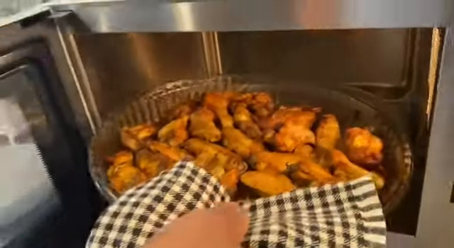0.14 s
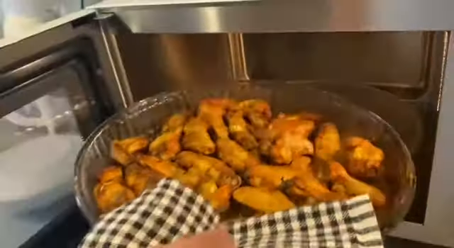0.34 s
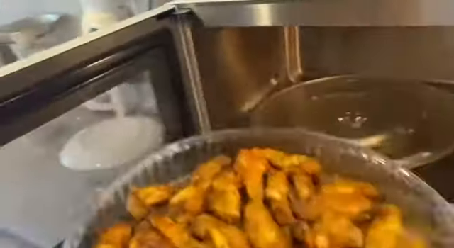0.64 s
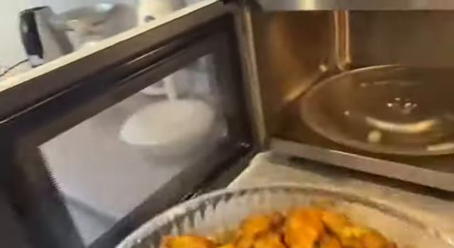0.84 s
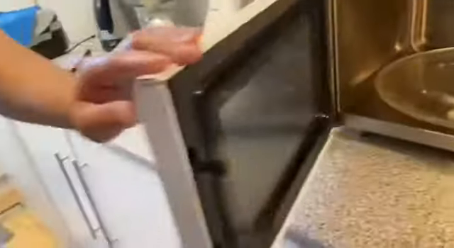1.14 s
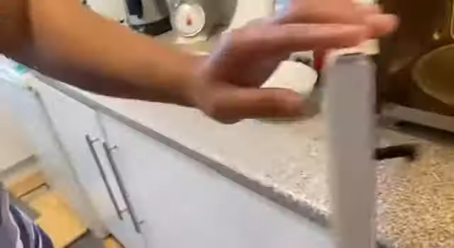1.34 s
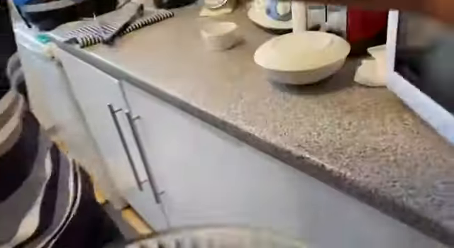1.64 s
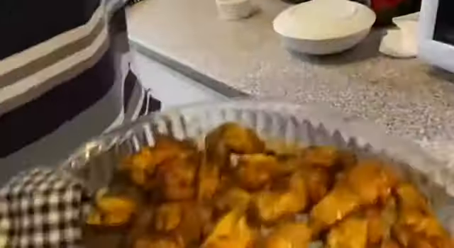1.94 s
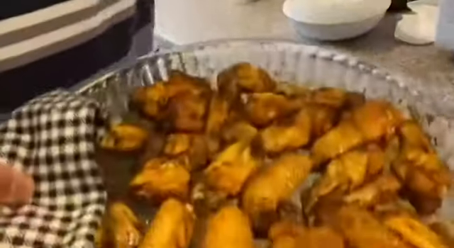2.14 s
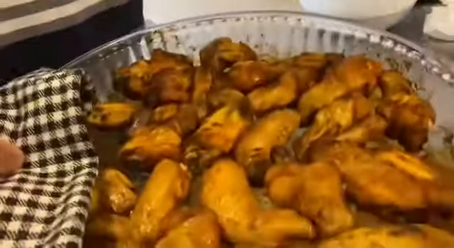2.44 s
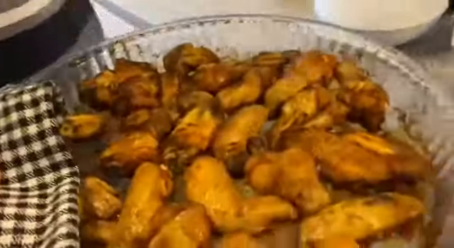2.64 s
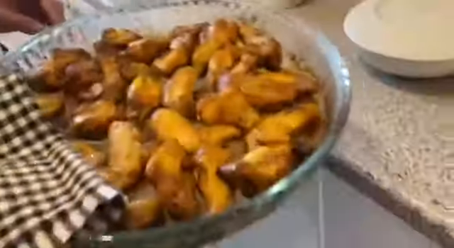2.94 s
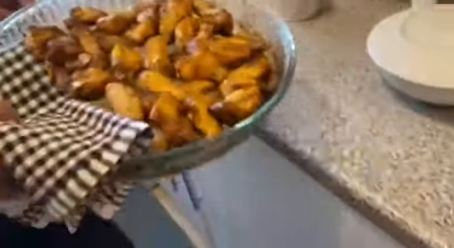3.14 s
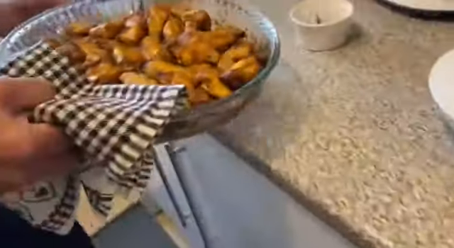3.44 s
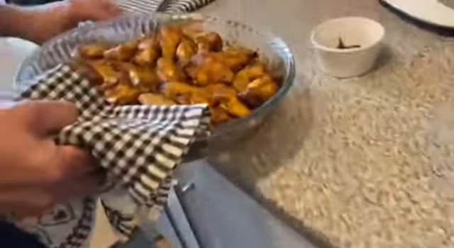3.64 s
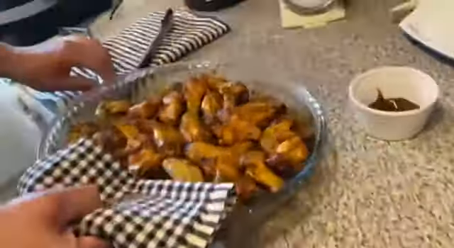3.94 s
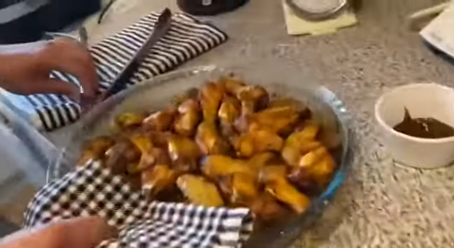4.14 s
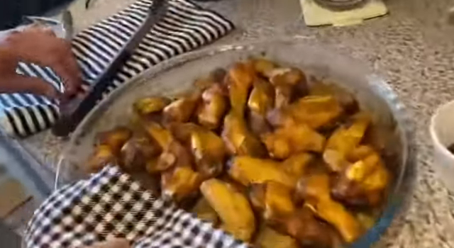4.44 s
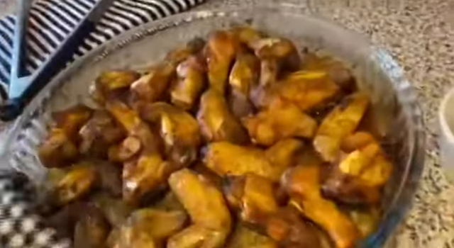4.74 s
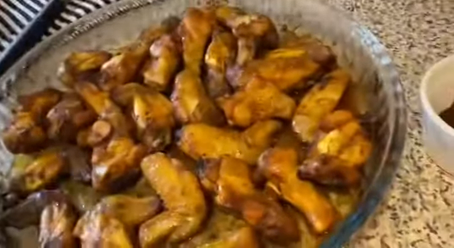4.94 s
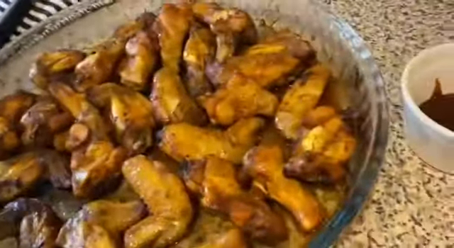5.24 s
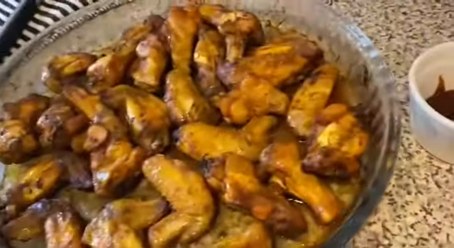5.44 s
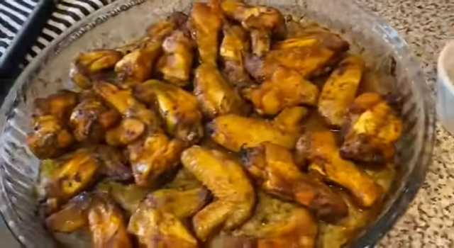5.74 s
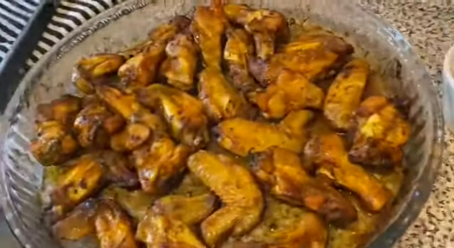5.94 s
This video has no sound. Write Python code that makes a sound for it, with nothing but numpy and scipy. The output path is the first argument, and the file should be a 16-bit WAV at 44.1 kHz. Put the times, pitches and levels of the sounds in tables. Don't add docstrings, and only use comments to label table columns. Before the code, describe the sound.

A steady oven fan fills a small kitchen from 0 to 6 seconds: broad airy rush over a low blade hum, strongest at the start and slowly changing colour as the handheld stereo microphone moves away. Faint cloth rubs, a tiny tick near 0.75 and a breathy duct swell around 0.9 come first. Fabric brushes at 1.15 and 1.9. At 2.01 a latch scrapes and clicks, and at 2.05 the door slams, loud, boxy and metallic, with a short low ring. Cloth rustles from 2.2, with a light glass tap at 2.63, growing busier through 3.7 with small ticks. At 3.85 a heavy glass dish lands on the worktop with a deep, blunt thud. Sliding and thin glassy ticks follow, then a second low knock at 4.39 as it settles. Cloth slips away by about 5; another soft airy swell at 5.2 and a tiny tick at 5.48 leave the fan and low hand rumble.

```python
import sys
import numpy as np
from scipy import signal
from scipy.fft import rfft, irfft, next_fast_len
from scipy.io import wavfile
from scipy.ndimage import uniform_filter1d

SR = 44100
rng = np.random.default_rng(int(sys.argv[2]) if len(sys.argv) > 2 else 0)


def undo_db(level):
    steps = np.asarray(level, float) / 20
    return 10 ** steps


def output_pcm(signal):
    pcm = np.clip(np.atleast_2d(signal).T, -1, 1) * 32767
    wavfile.write(sys.argv[1], SR, np.round(pcm).astype(np.int16))


N = 268555
SLAM_S = 2.043


def evened(x):
    return x / np.sqrt(np.mean(x ** 2) + 1e-20)


def read(points, hz):
    f, value = np.transpose(points)
    return np.interp(np.log(hz + 1), np.log(f + 1), value)


def columns(rows):
    s, *values = np.transpose(rows)
    return [np.interp(np.arange(N) / SR, s, v) for v in values]


def add(mix, s, sound):
    part = mix[round(s * SR):][:len(sound)]
    part += sound[:len(part)]


def shape(x, gain):
    size = next_fast_len(N)
    spectrum = rfft(np.resize(x, size))
    return irfft(spectrum * gain(np.fft.rfftfreq(size, 1 / SR)), size)[:N]


def noise_band(gain):
    return evened(shape(rng.standard_normal(N), gain))


def drift(hz):
    return noise_band(lambda f: (f > 0) / (1 + (f / hz) ** 4))


def swells(rows, rise_s, fall_s, drop_db=20.):
    s, db = np.transpose(rows)[:, :, None]
    since = np.arange(0, N + 64, 64) / SR - s
    return undo_db(2 * (db - drop_db * np.maximum(-since / rise_s, since / fall_s)))


def total_db(power, floor_db):
    total = np.interp(np.arange(N) / 64, np.arange(power.shape[1]), power.sum(0))
    return 10 * np.log10(total + undo_db(2 * floor_db))


# frequency in Hz, density in dB per Hz.
RUSH_SPECTRUM = [(25, -20), (60, -16), (90, -17), (185, -6), (265, -16.5), (360, -12), (543, -10),
                 (800, -14), (1520, -20.5), (2600, -32), (4930, -40), (7250, -54.5), (9500, -53),
                 (12000, -55)]
# frequency in Hz, left-right likeness 0-1.
LIKENESS = [(60, 1), (130, 1), (270, 0.55), (570, 0.28), (1200, 0.13), (2500, 0.19), (5300, 0.32),
            (11000, 0.14)]
# frequency in Hz, change in dB.
FAR_COLOUR = [(200, 2), (300, 2.), (700, -3.), (1200, 0.), (1750, 2.5), (2300, -1.5), (4000, 0), (9000, -1)]
# time in seconds, share of the way 0-1.
DISTANCE = [(0, 0.), (2, 0.37), (4, 0.15), (4.7, 1), (6.09, 0.8)]
# time in seconds, place along the kitchen in m, level of the rush in dB.
WALK = [(0, 0., -41), (.8, .07, -43), (1.4, .1, -44), (1.95, .17, -45), (2.4, .25, -45.3),
        (2.85, .32, -45.6), (3.5, .39, -45.3), (4.1, .45, -45), (4.7, .48, -46), (5.4, .48, -44.6),
        (6.09, .47, -48)]
# time in seconds, added rush in dB, added boom in dB.
STIRS = [
    (2.17, -40, -40),
    (3.87, -42, -45),
    (4.05, -48, -37),
    (4.41, -55, -35),
]
STIR_RISE_S, STIR_FALL_S = .08, .21


def fan_rush():
    frames, hz = N // 256 + 5, np.fft.rfftfreq(1024, 1 / SR)
    a, b, c, d, patches = rng.standard_normal((frames, 513, 5)).T
    patches = evened(uniform_filter1d(uniform_filter1d(patches, 8, 0), 10, 1))
    same = np.clip(read(LIKENESS, hz), 0, 1)[:, None]
    left = a + 1j * b
    right = same * left + np.sqrt(1 - same ** 2) * (c + 1j * d)
    away = np.interp(np.arange(frames) * 256 / SR, *np.transpose(DISTANCE))
    colour_db = read(RUSH_SPECTRUM, hz)[:, None] + read(FAR_COLOUR, hz)[:, None] * away + 1.63 * patches
    coloured = np.array([left, right]) * undo_db(colour_db)
    rush = signal.istft(coloured, nperseg=1024, noverlap=768)[1][:, :N]
    body = shape(rush[0], lambda f: (f > 250) * (f < 1500))
    stirred = swells(np.array(STIRS)[:, :2], STIR_RISE_S, STIR_FALL_S)
    return undo_db(total_db(stirred, columns(WALK)[1])) * rush / np.std(body)


# frequency in Hz, width in Hz, level in dB.
ROOM_MODES = [(119, 7.4, 2.5), (134, 11.3, 2.5), (146, 12, -4.5), (100, 7, -14), (80, 11, -9)]


def standing_waves():
    def modes(f):
        return sum(undo_db(db) / (1 + (2 * (f - hz) / width) ** 2) for hz, width, db in ROOM_MODES)

    boom, difference = noise_band(modes), noise_band(modes)
    place = columns(WALK)[0]
    deep_db = 14 * (place - .46)
    boom = boom + (undo_db(deep_db) - 1) * shape(boom, lambda f: f < 127)
    still_db = -48.5 + 72 * (place - .06) ** 2
    stirred = swells(np.array(STIRS)[:, ::2], STIR_RISE_S, STIR_FALL_S, drop_db=8.)
    return undo_db(total_db(stirred, still_db)) * (boom + 0.091 * np.array([[1], [-1]]) * difference)


# time in seconds, rumble in dB.
JOLTS = [(0., -57), (.68, -52), (.9, -50), (1.3, -58), (2.07, -40), (2.29, -43), (2.95, -50), (2.68, -48),
         (3.31, -44), (3.87, -36), (4.14, -46), (4.41, -35), (4.85, -49), (5.3, -50), (5.78, -50)]


def hand_rumble():
    rumble = noise_band(lambda f: (f / 40.) ** 2 / (1 + (f / 67.0) ** 6))
    rumble_db = total_db(swells(JOLTS, rise_s=.12, fall_s=.2), floor_db=-66)
    return undo_db(rumble_db + 0.5) * rumble


# level in dB, echo strength 0-1, place of the dip in m, gain while the door is open in dB.
TONES = [(-48.5, .6, .27, 6.), (-56.5, .5, .15, 1.5), (-55, .75, .15, 0.), (-51, .2, .05, 1.)]


def hum():
    blade_hz, mains_hz, sound_m_per_s = 178.8, 198, 343
    t = np.arange(N) / SR
    turns = np.cumsum(blade_hz * (1 + .0008 * drift(3.)) / SR)
    cycles = [turns, 2 * turns, 3 * turns, mains_hz * t, 1.5 * mains_hz * t]
    place = columns(WALK)[0]
    levels = []
    for (db, echo, dip, open_db), hz in zip(TONES, [blade_hz, 2 * blade_hz, 3 * blade_hz, mains_hz]):
        interference = abs(1 - echo * np.exp(4j * np.pi * hz * (place - dip) / sound_m_per_s))
        levels.append(db + open_db * (t < SLAM_S) + 20 * np.log10(interference))
    levels.append(levels[-1] - 10.)
    leads = [0.15, 0.46, 0.93, 0.99, 0.57]
    wavers_db = [.8, 2.5, 2.2, 1.2, 2.5]
    side = np.array([[.5], [-.5]])
    total = np.zeros((2, N))
    for db, cycle, lead, waver_db in zip(levels, cycles, leads, wavers_db):
        wavering = np.sqrt(2) * undo_db(db + waver_db * drift(9.))
        total += wavering * np.sin(2 * np.pi * cycle + side * lead)
    return total


# time of the peak in seconds, level in dB.
DUCT_SWELLS = [
    (.87, -56),
    (5.17, -56),
    (5.55, -60),
]


def duct():
    centre_hz, width_hz = 1750, 350.
    sides = np.array([noise_band(lambda f: 1 / (1 + (2 * (f - centre_hz) / width_hz) ** 4)) for _ in range(2)])
    swell_db = total_db(swells(DUCT_SWELLS, rise_s=.36, fall_s=.36), floor_db=-90)
    return undo_db(swell_db) * (sides + .6 * sides[::-1])


# frequency in Hz, t60 in seconds.
KITCHEN_T60 = [(100, 0.22), (400, 0.27), (1500, 0.27), (5000, 0.25), (10000, 0.2)]


def kitchen(x):
    taps = np.zeros((2, SR // 2))
    at = np.arange(200, SR // 2 - 20, 20) + rng.integers(0, 20, (2, (SR // 2 - 201) // 20))
    np.put_along_axis(taps, at, rng.choice([-1., 1.], at.shape), 1)
    hz, t, z = signal.stft(taps, SR, nperseg=256)
    decay = undo_db(-60 * t / read(KITCHEN_T60, hz)[:, None])
    tail = signal.istft(z * decay, SR, nperseg=256)[1]
    tail[1] = 0.078 * tail[0] + 0.77 * tail[1]
    return signal.fftconvolve(x[None], tail / np.linalg.norm(tail[0]), axes=1)[:, :N]


# frequency in Hz, lead of the left port in radians.
NEAR_LEAD = [(100, -0.065), (300, -0.13), (600, -0.81), (1460, -1.33), (3200, 1.25), (5000, .6),
             (8000, -1.25)]
# frequency in Hz, left minus right in dB.
NEAR_BALANCE = [(100, -1), (490, 0.5), (1400, 0), (4000, 5.5), (11000, 2)]


def ports(x):
    def transfer(f, side):
        return undo_db(side * read(NEAR_BALANCE, f)) * np.exp(1j * side * read(NEAR_LEAD, f))

    return np.array([shape(x, lambda f: transfer(f, side)) for side in (.5, -.5)])


def friction(level_db, spectrum, per_s, spread_db, tilt_db=0):
    sizes = undo_db(spread_db * np.minimum(rng.exponential(1, N), 4))
    slips = rng.standard_normal(N) * sizes * (rng.random(N) < per_s / SR)
    colour = evened(shape(slips, lambda f: undo_db(read(spectrum, f))))
    dull = shape(colour, lambda f: 1 / (1 + (f / 3000.) ** 4))
    return undo_db(level_db) * (undo_db(-2 * tilt_db) * dull + colour - dull)


# time of the peak in seconds, level in dB, length in seconds, brightness in dB.
STROKES = [(0., -63, .12, -3), (.85, -64, .7, -3), (1.152, -55, .16, 0.), (1.3, -60, .35, -2),
           (1.6, -63, .2, 1.), (1.89, -54, .28, -1), (2.22, -58, .15, 0.), (2.344, -54, .24, 14),
           (2.7, -48.5, .2, -.6), (2.655, -54, .08, 0.), (2.74, -54, .1, 0.), (2.918, -54, .17, 5),
           (3.026, -51.5, .11, .6), (3.116, -53.5, .09, 8), (3.228, -55, .14, 8), (3.35, -53.5, .1, 7),
           (3.456, -47.5, .11, 2.), (3.564, -46, .15, -1.2), (3.682, -50, .16, 1.2), (3.91, -61, .3, 6),
           (4.07, -50.5, .08, -1.5), (4.165, -49, .18, 2.), (4.32, -47.5, .06, -3), (4.39, -49, .12, 0.),
           (4.51, -54, .06, 1.2), (4.64, -54, .2, 8), (4.94, -49, .12, 13), (5.47, -68, .07, -1.2),
           (5.56, -65, .2, 2.), (5.74, -62, .12, 1.2)]
# frequency in Hz, density in dB per Hz.
CLOTH_SPECTRUM = [(300, -36), (700, -11), (900, -4.5), (3280, -7), (7540, -17), (9300, -16), (12000, -20)]


def cloth():
    rise_share, faint_db = .33, -70
    s, db, length, bright_db = np.transpose(STROKES)
    rise_s, fall_s = rise_share * length[:, None], (1 - rise_share) * length[:, None]
    power = swells(np.transpose([s, db]), rise_s, fall_s, drop_db=16.)
    mean_bright = (power * bright_db[:, None]).sum(0) / (power.sum(0) + undo_db(2 * faint_db))
    tilt_db = np.repeat(mean_bright, 64)[:N]
    return friction(total_db(power, faint_db) + 4.3, CLOTH_SPECTRUM, per_s=7000., spread_db=2.1, tilt_db=tilt_db)


# time in seconds, level in dB.
LATCH = [
    (2.008, -58),
    (2.011, -21.5),
    (2.02, -26),
    (2.034, -30),
    (2.042, -18),
    (2.047, -7),
    (2.056, -23),
    (2.075, -26),
    (2.12, -63),
]
# frequency in Hz, density in dB per Hz.
STEEL_SPECTRUM = [(120, -18), (250, -8.5), (643, -9), (976, -10.5), (2600, -13.5), (5330, -22), (7340, -26),
                  (10100, -19.5), (12000, -23.5)]


def latch():
    return friction(columns(LATCH)[0], STEEL_SPECTRUM, per_s=6000., spread_db=1.0)


# time in seconds, peak in dB, pitch in Hz, t60 in seconds, share that rings clear.
TICKS = [(.747, -46, 10300, .012, 0.1), (2.89, -43, 3300, .05, 0.3), (3.003, -49, 9500, .02, 0.),
         (3.324, -33, 900, 0.046, .3), (3.847, -36.5, 4600, 0.032, 0.27), (4.072, -50, 4200, 0.05, 0.5),
         (4.139, -39, 3010, .04, 0.7), (4.315, -41, 5630, .08, .8), (4.325, -43, 4200, .06, .7),
         (4.376, -46, 5000, .02, 0.), (4.388, -36.5, 4260, .035, 0.65), (4.51, -47, 7300, 0.022, 0.3),
         (5.48, -43.5, 9500, 0.012, 0.2)]


def ticks(near):
    t = np.arange(6000) / SR
    for s, db, hz, t60, clear in TICKS:
        band = signal.butter(1, [hz / 1.72, min(hz * 1.1, 11800)], "bandpass", fs=SR)
        burst = signal.lfilter(*band, rng.standard_normal(len(t)))
        ring = np.sin(2 * np.pi * hz * t)
        add(near, s, undo_db(db - 60 * t / t60) * (2 * (1 - clear) * burst + clear * ring))


def blow(modes, db, lag, sweep_db, top_hz):
    t = np.arange(SR // 2) / SR
    since = t + 2.806 / top_hz
    sweep = np.sin(2 * np.pi * 2.797 * np.log(since / since[0]))
    sound = undo_db(sweep_db - 60 * t / 0.063) * (1 - np.exp(-t / .0015)) * sweep
    for hz, mode_db, t60 in modes:
        places, phases = rng.standard_normal((2, 24, 1))
        crowd = np.sin(2 * np.pi * (hz * np.exp(.22 * places) * t + phases)).sum(0) / np.sqrt(24)
        crowd_decay = undo_db(-6.5 - 60 * t / (1.94 * t60))
        ring = undo_db(-60 * t / t60) * np.sin(2 * np.pi * hz * t)
        ring += crowd_decay * min(hz / 480.0, 1) * (1 - np.exp(-t / .002)) * crowd
        onset = 1 - np.exp(-(t / (lag / hz + .0008)) ** 3)
        sound = sound + undo_db(mode_db) * onset * ring
    return undo_db(db) * sound


# frequency in Hz, level in dB, t60 in seconds.
CATCH_MODES = [(200, -8, .1), (347, 3.5, 0.12), (675, -6, .05), (1200, -8, .05), (2200, -8, 0.036)]
DOOR_MODES = [(60.6, -14, 0.16), (162.6, 0.5, 0.19), (206, -8.5, .3), (224.4, -16.5, .6), (391, 1.5, 0.092),
              (843, -2.5, 0.045), (1150, -11.5, 0.078), (1590, -12, 0.056), (2540, -10.5, 0.038),
              (3390, -20, 0.055)]


def door_blows(near):
    add(near, 2.011, blow(CATCH_MODES, db=-23, lag=2.5, sweep_db=-14, top_hz=3000))
    add(near, SLAM_S, blow(DOOR_MODES, db=-7.5, lag=1.3, sweep_db=-9, top_hz=2200))


# frequency in Hz, level in dB, t60 in seconds.
RIM_MODES = [(1150, -6, 0.076), (1454, -1.5, 0.072), (1895, -6.5, 0.071), (2520, -12, 0.05)]
DISH_MODES = [(118.4, 0., .16), (399, -13, 0.077), (520, -7, .05), (630, 5, 0.022), (760, -1, .04),
              (1100, -6, .04), (1384, -9, 0.039), (2056, -12, 0.026)]
WORKTOP_MODES = [(110, -1.5, 0.2), (229.7, -11, 0.18), (338, -3, 0.097), (598, -12.5, 0.06),
                 (754, -10, 0.034), (1030, -1.5, 0.015)]


def dish_blows(near):
    add(near, 2.632, blow(RIM_MODES, db=-30, lag=2, sweep_db=-4, top_hz=3000))
    add(near, 3.8472, blow(DISH_MODES, db=-7, lag=1.05, sweep_db=-11, top_hz=1100))
    add(near, 4.39, blow(WORKTOP_MODES, db=-8.5, lag=1.3, sweep_db=-5, top_hz=1200))


def scene():
    near = cloth() + latch()
    door_blows(near)
    dish_blows(near)
    ticks(near)
    wet = shape(near, lambda f: f ** 2 / (f ** 2 + 265.0 ** 2))
    background = fan_rush() + standing_waves() + hand_rumble() + hum() + duct()
    return ports(near) + undo_db(-4) * kitchen(wet) + background


SHARP_MOMENTS = [
    .75,
    2.012,
    3.003,
    3.85,
    4.235,
    4.39,
    4.51,
    5.48,
]


def thin(x, colour, holes):
    hz, t, z = signal.stft(x, SR, nperseg=1024, noverlap=768)
    field = evened(uniform_filter1d(uniform_filter1d(rng.standard_normal(z.shape), 6, 0), 9, 1))
    share = 0
    for low, high, part, edge in holes:
        share = share + part * np.clip(np.minimum(hz - low, high - hz) / edge + .5, 0, 1)
    dropped = 1 / (1 + np.exp(1.7 * field)) < share[:, None]
    sharp = (abs(t[:, None] - SHARP_MOMENTS).min(1) < .007) & (hz < 12300)[:, None]
    keep = np.where(dropped, np.where(sharp, .5, 0), 1)
    coloured = z * keep * undo_db(read(colour, hz))[:, None]
    return signal.istft(coloured, SR, nperseg=1024, noverlap=768)[1][:N]


def band_limit(x):
    return signal.sosfilt(signal.butter(12, 11900, fs=SR, output="sos"), x)


# frequency in Hz, gain in dB.
SUM_COLOUR = [(7600, 0.5), (9000, -3), (10300, 2), (11300, -5)]
SIDE_COLOUR = [(300, 0.5), (1000, 2.), (4000, 0.), (7000, 5.5), (8500, 2), (11300, 0.5), (12000, -3)]
# lower edge in Hz, upper edge in Hz, share dropped 0-1, width of the edges in Hz.
SUM_HOLES = [(2500, 12500, .02, 1000), (7800, 8900, .98, 400), (11200, 30000, .98, 500)]
SIDE_HOLES = [(1000, 12500, .04, 1000), (3650, 4400, .16, 700), (6300, 7450, .44, 450),
              (9300, 11050, .96, 500), (11100, 12000, .2, 300), (11800, 30000, 1, 500)]


def record(dry):
    left, right = .9 * np.tanh(dry / .9)
    mid = thin((left + right) / 2, SUM_COLOUR, SUM_HOLES)
    side = thin((left - right) / 2, SIDE_COLOUR, SIDE_HOLES)
    return band_limit(np.array([mid + side, mid - side]))


dry = scene()
out = record(dry)
output_pcm(out)
```